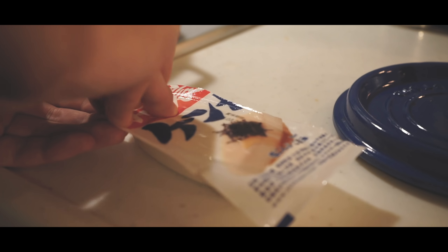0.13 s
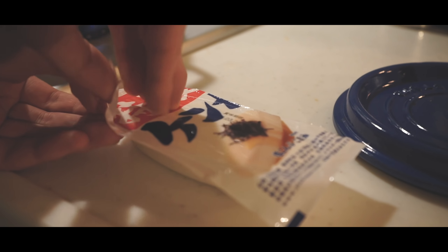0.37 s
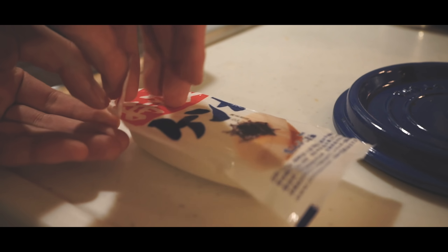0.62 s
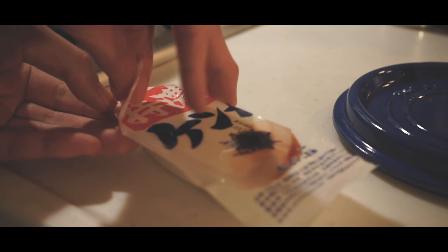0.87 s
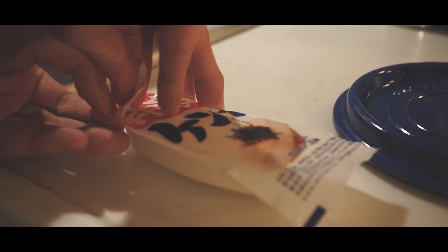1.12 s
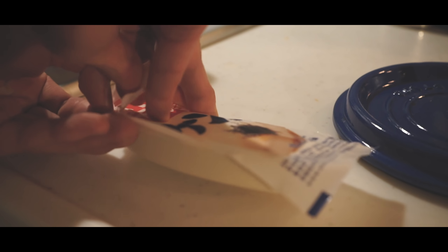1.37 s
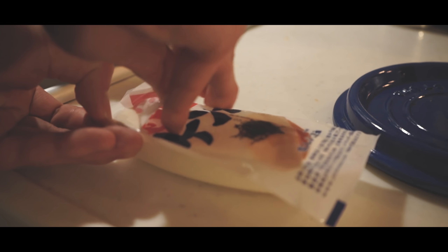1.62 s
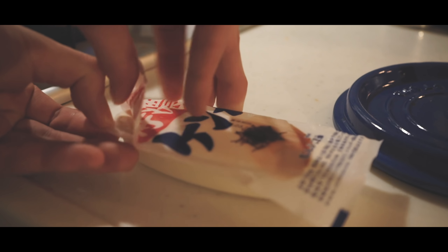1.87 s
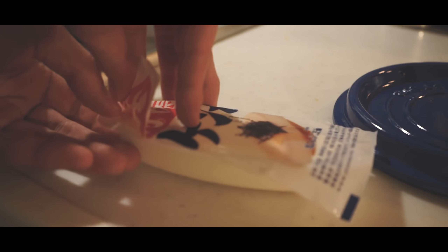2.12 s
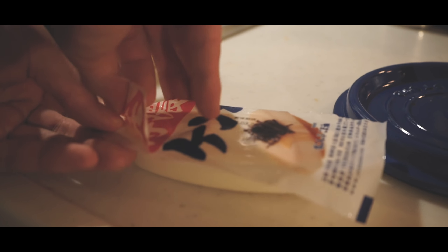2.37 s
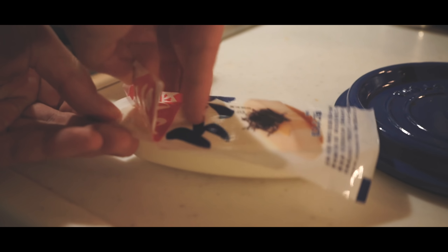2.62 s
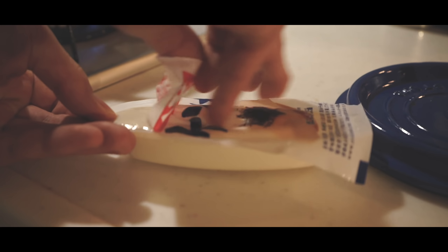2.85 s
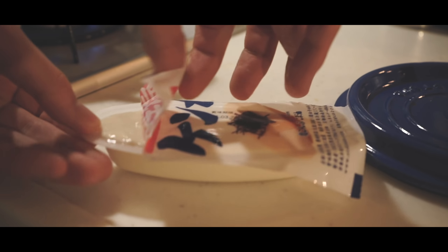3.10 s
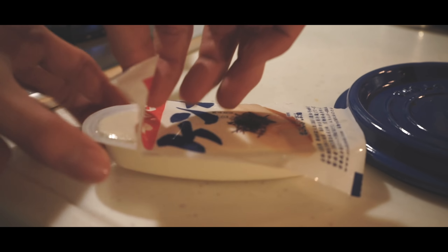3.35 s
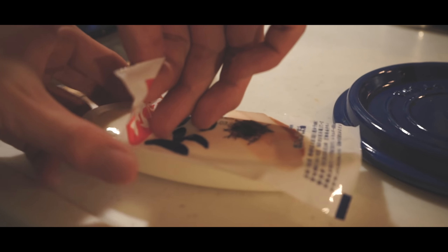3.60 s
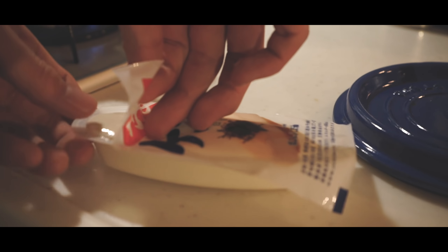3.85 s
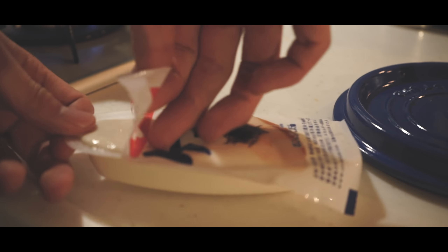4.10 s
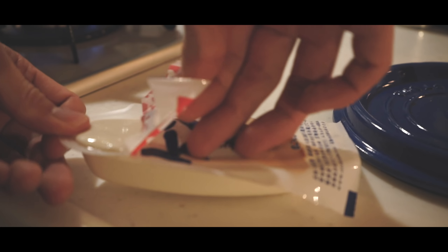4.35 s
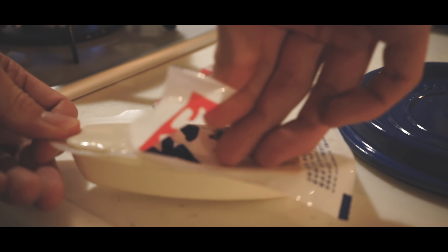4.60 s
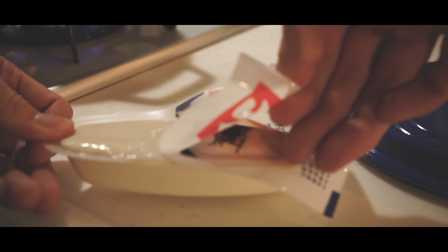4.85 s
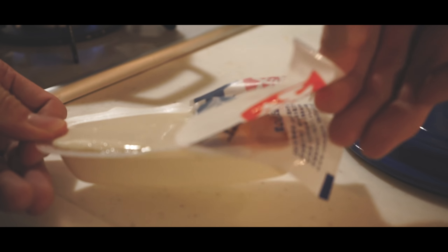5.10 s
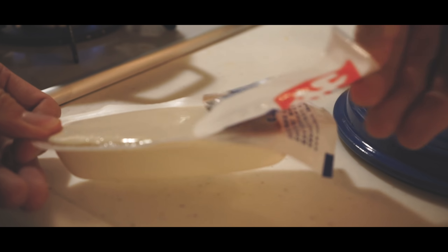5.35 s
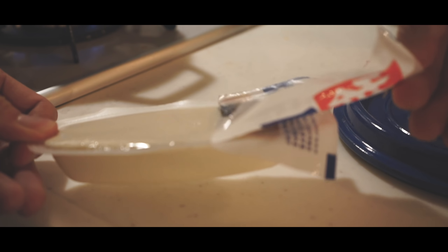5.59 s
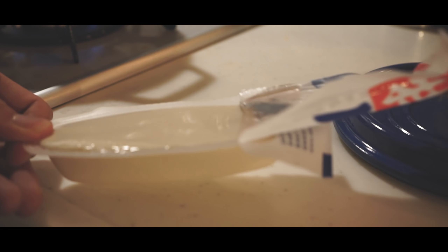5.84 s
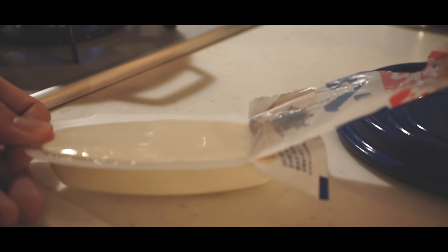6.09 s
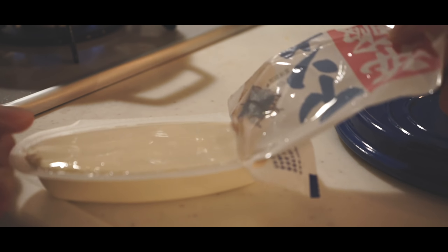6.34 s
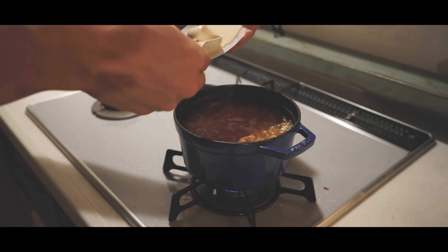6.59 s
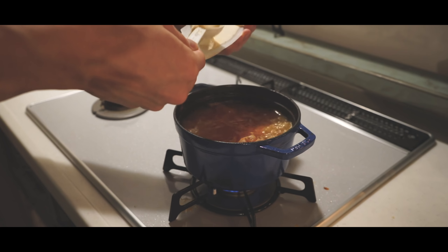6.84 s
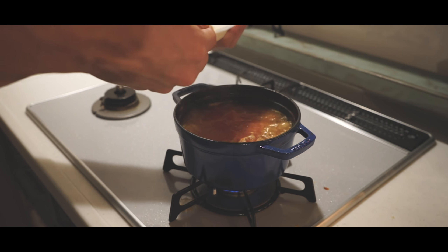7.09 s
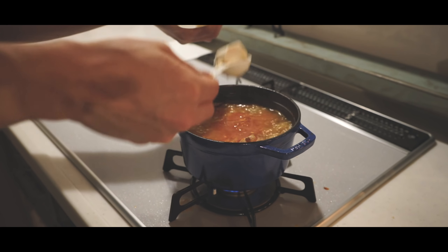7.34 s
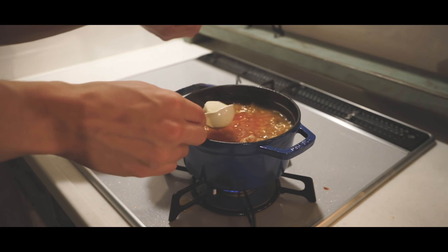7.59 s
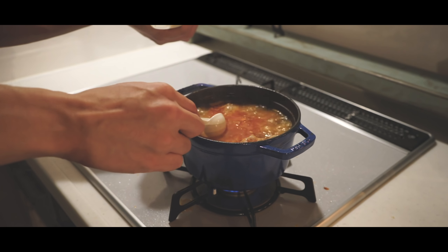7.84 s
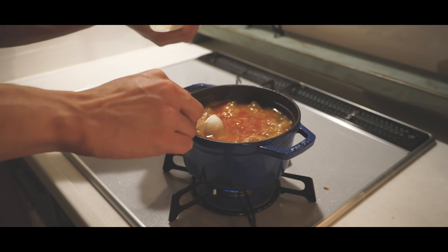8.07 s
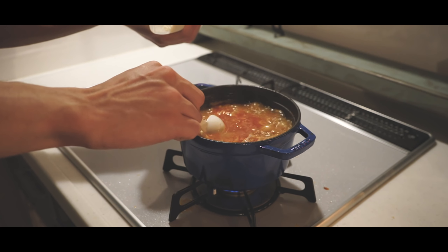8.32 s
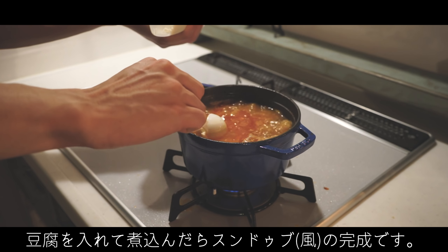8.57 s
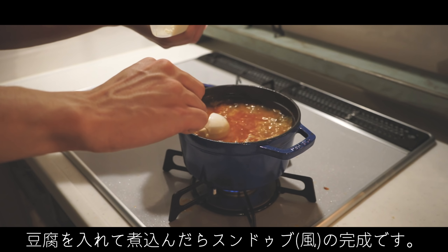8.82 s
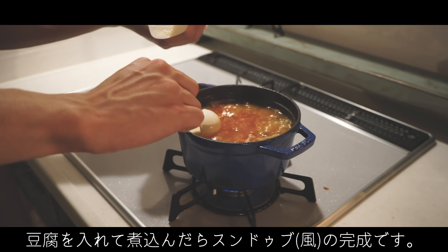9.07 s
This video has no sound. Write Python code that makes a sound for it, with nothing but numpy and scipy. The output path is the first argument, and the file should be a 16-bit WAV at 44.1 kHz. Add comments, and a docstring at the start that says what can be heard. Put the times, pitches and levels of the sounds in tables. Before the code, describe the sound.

Someone crinkles and rips open a plastic packet beside gently plopping soup; after about six seconds only the bubbling, spitting pot and faint flame remain.

```python
"""A plastic packet is handled and torn open close by: stiff film buckles in short damped shivers and cracks
over a rustle of uneven clicks and patchy noise. Soup simmers in a small metal pot on a gas hob: damped sines
plop, spit and ring the pot over shaped noise; the flame is noise that rumbles and hisses.
A worktop echo and decaying noise tails from hard kitchen walls answer every snap and spit."""
import sys
import numpy as np
from scipy import signal
from scipy.fft import rfft, irfft, next_fast_len
from scipy.io import wavfile
from scipy.ndimage import uniform_filter1d, map_coordinates

SR = 44100
rng = np.random.default_rng(int(sys.argv[2]) if len(sys.argv) > 2 else 0)


def file_out(sig):
    """Save sig as 16-bit WAV at sys.argv[1]."""
    # one column per channel
    cols = np.atleast_2d(sig).T
    # limit, then scale
    lim = np.clip(cols, -1, 1)
    pcm = np.round(lim * 32767).astype(np.int16)
    wavfile.write(sys.argv[1], SR, pcm)


def gain_from_db(level_db):
    """Convert decibel levels to linear amplitude factors (20 dB per decade)."""
    decades = np.asarray(level_db, float) / 20
    return 10 ** decades


N = 405719

# film rustle before rubs and clumps: t/s, crackle level/dB, treble level/dB
RUSTLE_LEVELS = [(0.0, -63.5, -55.5), (0.23, -69, -81.5), (0.84, -68, -92), (1.41, -67.5, -80),
                 (1.56, -57.5, -69.5), (2.28, -63, -77), (2.61, -67, -76), (2.77, -52.5, -56),
                 (3.28, -67.5, -79.5), (3.64, -65.5, -70.5), (3.79, -72, -89), (4.07, -65.5, -78.5),
                 (4.53, -68.5, -82), (4.66, -51, -70), (4.79, -44.5, -76), (4.89, -58.5, -67),
                 (5.07, -62.5, -74), (5.74, -65.5, -68.5), (5.89, -49, -48), (6.05, -70.5, -94),
                 (6.58, -67.5, -87), (6.94, -70.5, -76), (7.58, -67, -84), (8.12, -74, -74.5),
                 (8.58, -69.5, -82), (9.2, -63.5, -93)]
# treble hiss spectrum: f/Hz, relative level per Hz/dB
HISS_SPECTRUM = [(4000, -11), (6500, -2), (9000, -5), (15400, -1), (15800, -8), (16100, -44.5)]
# how hard the soup surface breaks: t/s, relative level/dB
VIGOUR_LEVELS = [(0, -5), (6.6, -5), (6.7, 0), (9.2, 0)]


def unit(x):
    """Scaled to rms 1."""
    return x / np.sqrt(np.mean(x ** 2) + 1e-20)


def along(points, hz):
    """Values of (f/Hz, value) points, interpolated on a log frequency axis."""
    f, v = np.transpose(points)
    return np.interp(np.log(hz + 1), np.log(f + 1), v)


def curves(rows):
    """One value per sample for each column after the time."""
    s, *cols = np.transpose(rows)
    return [np.interp(np.arange(N) / SR, s, c) for c in cols]


def wobble(rate):
    """A smooth random curve, rate knots a second."""
    knots = rng.standard_normal(int(N * rate / SR) + 4)
    return map_coordinates(knots, [np.arange(N) * rate / SR])


def filtered(x, response):
    """x times a complex response of frequency."""
    m = next_fast_len(N + SR // 2)
    return irfft(rfft(x, m) * response(np.fft.rfftfreq(m, 1 / SR)), m)[:N]


def coloured(x, spectrum):
    """x given a spectrum, rms 1."""
    return unit(filtered(x, lambda hz: gain_from_db(along(spectrum, hz))))


def resonances(modes):
    """Causal response of (f/Hz, width/Hz, level/dB) modes."""
    return lambda f: sum(gain_from_db(db) * 1j * f * w / (c * c - f * f + 1j * f * w) for c, w, db in modes)


def placed(seconds, rows):
    """Sum of rows, each starting at its own moment."""
    at = np.round(np.asarray(seconds) * SR).astype(int)[:, None] + np.arange(rows.shape[1])
    return np.bincount(at.clip(0).ravel(), rows.ravel(), N + rows.shape[1] + SR)[:N]


def blips(db, hz, cycles, rise, glide=0, size=512):
    """Damped sines of envelope peak db: life in cycles, attack as a share of life, pitch up by glide a life."""
    u = np.arange(size) / SR * hz[:, None] / cycles  # time in lives
    shape = (1 - np.exp(-u / rise)) ** 2 * np.exp(-u)
    wave = np.sin(2 * np.pi * cycles * u * (1 + glide * u / 2))
    return gain_from_db(db)[:, None] * wave * shape / shape.max(1, keepdims=True)


def cracks(db, life_s, low_hz):
    """Treble noise bursts of peak db with an exponential decay, 1/e in life_s."""
    noise = rng.standard_normal((len(db), 256))
    burst = noise * np.exp(-np.arange(256) / SR / life_s)
    band = signal.butter(4, [low_hz, 16800], "band", fs=SR, output="sos")
    burst = signal.sosfilt(band, burst)
    return gain_from_db(db)[:, None] * burst / np.abs(burst).max(1, keepdims=True)


def grains(rate, spread_db):
    """Random clicks of uneven size, rate a second."""
    size = gain_from_db(spread_db * rng.exponential(size=N).clip(0, 4))
    return (rng.random(N) < rate / SR) * rng.standard_normal(N) * size


def patchy(depth_db):
    """Noise whose strength varies in patches of pitch and time, rms 1."""
    z = signal.stft(rng.standard_normal(N), nperseg=512)[2]
    field = uniform_filter1d(uniform_filter1d(rng.standard_normal(z.shape), 14, 0), 6, 1)
    return unit(signal.istft(z * gain_from_db(depth_db * unit(field)), nperseg=512)[1][:N])


def lesser(start_s, end_s, level_db, low_hz, high_hz, count):
    """Random small events: moments, levels within 4 dB of level_db, pitches between two limits."""
    draw = rng.random((count, 3))
    s = start_s + (end_s - start_s) * draw[:, 0]
    db = level_db + 8 * (draw[:, 1] - .5)
    return s, db, low_hz * (high_hz / low_hz) ** draw[:, 2]


def kitchen(x):
    """Wall echoes die band by band; their pattern drifts as the hands move: two tails trade places."""
    # wall decay: f/Hz, t60/s
    decay = [(500, 0.44), (3000, 0.14), (6000, 0.18), (14000, 0.12)]
    # pot and corner colour of the echoes: f/Hz, width/Hz, relative level/dB
    hollow = [(834, 266, 8), (3570, 97, 3), (4800, 570, -26)]
    hz, t, z = signal.stft(rng.standard_normal((2, SR // 2)), SR, nperseg=256)
    fade = gain_from_db(-60 * t / along(decay, hz)[:, None])
    tails = signal.istft(z * fade, SR, nperseg=256)[1]
    turn = 2 * np.pi * 9.5 * np.arange(N) / SR
    parts = np.pad(x * [np.cos(turn), np.sin(turn)], [(0, 0), (60, 0)])
    wet = signal.fftconvolve(parts, tails / np.linalg.norm(tails[0]), axes=1).sum(0)[:N]
    return 0.73 * wet + filtered(wet, resonances(hollow))


def flame():
    """Gas burner: low noise of slowly wandering level rumbles under a thin steady hiss."""
    # rumble: t/s, level/dB
    burner = [(0.0, -72), (0.07, -59), (3.23, -57), (3.33, -50), (3.51, -63.5), (3.56, -55.5),
              (4.05, -63.5), (8.22, -53), (8.56, -58.5), (8.99, -47), (9.02, -55), (9.2, -51.5)]
    # rumble spectrum: f/Hz, relative level per Hz/dB
    rumble_spectrum = [(8.8, -26.5), (15, 2), (84, -4.5), (140, -13), (161, -30), (200, -13), (260, -43.5),
                       (440, -120)]
    flame_db, = curves(burner)
    hiss = gain_from_db(-78) * coloured(rng.standard_normal(N), HISS_SPECTRUM)
    rumble = coloured(rng.standard_normal(N), rumble_spectrum)
    return hiss + gain_from_db(flame_db + 1.1 * wobble(7)) * rumble


def droplets(count):
    """Thrown droplets land in showers of five like-pitched ticks and ring the pot's thin wall."""
    # pot wall: f/Hz, width/Hz, relative level/dB
    rim = [(3450, 150, -1.5), (4780, 130, 1.5), (6330, 90, -5), (7140, 90, -4.5)]
    shower = np.repeat(rng.random((count, 3)), 5, 0)
    draw = rng.standard_normal((count * 5, 3))
    hz = (1300 * 11.5 ** shower[:, 1] * np.exp(.2 * draw[:, 1])).clip(0, 16000)
    # a few big showers among many fine ones
    size_db = 14 * shower[:, 0] ** 3 + 5 * draw[:, 0] + .8 * np.log2(hz)
    s = shower[:, 2] * N / SR + .007 * np.abs(draw[:, 2])
    ticks = unit(placed(s, blips(size_db, hz, cycles=1.3, rise=.3, size=128)))
    return ticks + gain_from_db(4) * filtered(ticks, resonances(rim))


def simmer():
    """Unseen bubbles murmur as lumpy noise, blub as damped sines and throw droplets, louder as the boil grows."""
    # boil, common to murmur and surface: t/s, level/dB
    boil = [(0.0, -56), (1.53, -61.5), (2.61, -57), (2.74, -54), (4.07, -60), (4.82, -54.5), (5.12, -59.5),
            (5.48, -54.5), (6.66, -57.5), (6.92, -52), (7.38, -56.5), (9.2, -51)]
    # murmur spectrum: f/Hz, relative level per Hz/dB
    murmur_spectrum = [(71, -46), (120, 2.5), (178, 0.5), (264, -1.5), (473, -1), (787, -6.5), (905, 7.5),
                       (1050, -11.5), (1580, -12), (2500, -26), (3250, -44), (5500, -120)]
    simmer_db, = curves(boil)
    churn = 1.2 * unit(grains(120, spread_db=-1.0)) + rng.standard_normal(N)
    murmur = gain_from_db(2.2 * wobble(18) - 3.0) * coloured(churn, murmur_spectrum)
    draw = rng.random((1000, 3))
    # a rising pocket breaks into eight bubbles
    burst_s = np.repeat(rng.random(125) * N / SR, 8) + .03 * draw[:, 2] ** 2
    blub_db = 3 + 13 * draw[:, 0] ** 3 - 7 * draw[:, 1]
    blubs = blips(blub_db, 250 * 9 ** draw[:, 1], cycles=.9, rise=.5, size=1024)
    surface = placed(burst_s, blubs) + gain_from_db(-10.5) * droplets(count=650)
    return gain_from_db(simmer_db) * (murmur + gain_from_db(curves(VIGOUR_LEVELS)[0]) * surface)


def pot():
    """Every knock rings the pot's modes at new strengths; the boiling soup roughens the ring."""
    # loud knocks that ring the pot: t/s, level/dB
    loud_knocks = [(0.115, -46), (0.371, -48), (0.399, -39), (0.64, -46), (0.839, -46.5), (1.097, -48.5),
                   (1.206, -47), (1.893, -46), (2.326, -39.5), (2.572, -42.5), (2.914, -46.5),
                   (2.986, -47.5), (3.248, -36), (3.515, -42), (3.635, -43), (4.232, -39), (4.361, -40.5),
                   (4.403, -35.5), (4.454, -37.5), (4.644, -41), (4.718, -34), (4.742, -37), (4.86, -40.5),
                   (5.171, -46.5), (5.438, -39), (5.476, -40), (5.793, -45.5), (6.035, -43.5), (6.3, -40),
                   (6.759, -47), (6.918, -44.5), (7.056, -44), (7.177, -47.5), (7.674, -45), (8.233, -43),
                   (8.557, -48), (8.665, -43), (8.737, -46.5), (8.951, -44), (9.057, -42)]
    # pot modes before scatter: f/Hz, level re knock/dB, t60/s
    pot_modes = [(865.5, 3, 0.066), (967, -5.5, 0.077), (481.3, -13, 0.16)]
    small = lesser(0, N / SR, -53, 1, 1, count=35)[:2]
    s, db = np.hstack([small, np.transpose(loud_knocks)])
    t = np.arange(4096) / SR
    draw = rng.standard_normal((len(s), len(pot_modes), 2))
    ring = 0
    for k, (hz, level_db, t60_s) in enumerate(pot_modes):
        decay = gain_from_db(level_db + 1.54 * draw[:, k, :1] - 60 * t / t60_s)
        ring = ring + decay * np.sin(2 * np.pi * hz * (1 + 0.02 * draw[:, k, 1:]) * t)
    attack = 1 - np.exp(-t / 0.0015)
    return gain_from_db(4 * wobble(110)) * placed(s - .002, gain_from_db(db)[:, None] * ring * attack)


def plops():
    """Big bubbles collapse in blunt damped sines of slightly rising pitch."""
    # loud big bubbles: t/s, peak level/dB, f/Hz
    loud_plops = [(0.066, -44, 452), (0.384, -42, 460), (0.446, -46, 490), (1.093, -48, 465),
                  (1.893, -38.5, 573), (2.324, -46, 360), (2.391, -44, 530), (2.829, -39, 526),
                  (2.913, -40, 638), (3.236, -37.5, 401), (4.724, -37, 546), (5.272, -46.5, 470),
                  (5.375, -45, 448), (6.771, -40.5, 396), (6.849, -41.5, 477), (7.404, -43, 460),
                  (7.672, -40, 440), (7.906, -40, 288), (8.114, -42, 456), (8.228, -43.5, 475),
                  (8.409, -41, 440), (8.608, -46.5, 275), (8.762, -37, 446), (8.899, -43, 278),
                  (9.143, -45, 380)]
    small = lesser(0, N / SR, -53, 240, 560, count=30)
    s, db, hz = np.hstack([small, np.transpose(loud_plops)])
    return placed(s + .002, blips(db, hz, cycles=1.5, rise=.4, glide=.04, size=2048))


def spits():
    """Small bubbles burst with a damped-sine tick, a ragged splash of drops and a noise spray."""
    # loud small bubbles: t/s, tick peak level/dB, f/Hz
    loud_spits = [(6.6607, -45, 2090), (6.7424, -47, 1590), (6.9605, -40, 4790), (6.983, -43, 3500),
                  (7.0567, -48, 1330), (7.0858, -52, 3330), (7.1067, -23, 3700), (7.175, -47, 1490),
                  (7.2986, -44, 1480), (7.3345, -46, 2020), (7.3978, -39.5, 3220), (7.6061, -52, 1340),
                  (7.6194, -37, 2200), (7.655, -39, 1970), (7.6966, -47, 2070), (7.7663, -36, 1560),
                  (7.851, -40, 4870), (7.89, -41, 1360), (7.949, -36.5, 4950), (8.0402, -35.5, 4640),
                  (8.1752, -35.5, 4800), (8.2541, -38.5, 1290), (8.3417, -38.5, 5130), (8.4257, -39, 3150),
                  (8.4664, -40.5, 1770), (8.5455, -43, 2300), (8.566, -40.5, 1440), (8.6176, -42.5, 5380),
                  (8.7001, -48, 1480), (8.7366, -36.5, 1360), (8.7848, -42, 3500), (8.92, -39, 5140),
                  (8.959, -26.5, 3300), (9.0569, -38.5, 1310), (9.0644, -34.5, 3500), (9.1453, -38, 1460)]
    small = lesser(VIGOUR_LEVELS[2][0], N / SR, -51, 1550, 8200, count=35)
    s, db, hz = np.hstack([small, np.transpose(loud_spits)])
    draw = rng.standard_normal((len(s), 13))
    ticks = placed(s, blips(db, hz, cycles=1.57, rise=0.047))
    for k in range(6):  # the torn film falls back in drops
        drop_hz = hz * np.exp(.3 * draw[:, k + 6])
        drops = blips(db - 10, drop_hz, cycles=1.5, rise=.25)
        ticks = ticks + placed(s + .007 * np.abs(draw[:, k]), drops)
    # re tick peak; finer bursts spray more, 3 dB per octave
    spray_db = -22 + 3 * np.log2(hz / 2000) + 5 * draw[:, 12]
    return ticks + placed(s, cracks(db + spray_db, life_s=0.002, low_hz=5500))


def rustle():
    """Countless tiny creases, clumped: gritty noise with its own treble, swelling as fingers slide over the film."""
    # finger rubs: t/s, 1/e half length/s, swell/dB
    rubs = [(0.01, 0.021, 6.5), (0.175, 0.051, 18.5), (0.633, 0.027, 9.5), (0.95, 0.04, 10.5),
            (2.16, 0.057, 3), (3.118, 0.027, 11), (3.705, 0.067, 15), (5.025, 0.061, 13),
            (5.441, 0.057, 17)]
    # crackle spectrum: f/Hz, relative level per Hz/dB
    crackle_spectrum = [(650, -65), (1100, 3.5), (1620, -24), (1770, 2.5), (2260, 8.5), (2740, -1.5),
                        (3430, 9), (3980, -1.5), (5070, 3.5), (8000, -30.5), (10400, -36), (17600, -120)]
    t = np.arange(N) / SR
    rub_db = sum(db * np.exp(-((t - s) / half_s) ** 2) for s, half_s, db in rubs)
    crackle_db, treble_db = np.array(curves(RUSTLE_LEVELS)) + rub_db
    grit = unit(grains(1500, spread_db=9.0))
    clumps_db = 1.8 * wobble(30) + 1.2 * wobble(9)
    body = coloured(0.29 * grit + patchy(depth_db=3), crackle_spectrum)
    flicker_db = .6 * clumps_db + 1.2 * wobble(40)
    treble = coloured(0.48 * grit + patchy(depth_db=2), HISS_SPECTRUM)
    return gain_from_db(crackle_db + clumps_db) * body + gain_from_db(treble_db + flicker_db) * treble


def packet():
    """Each buckle cracks and shivers the bag's face, creases and belly for a few cycles; lesser ones follow the rustle."""
    # loud buckles, crack before its treble filter: t/s, face level/dB, crease level/dB, belly level/dB, crack level/dB
    loud_snaps = [(0.0705, -44, -27, -43, -35), (0.1288, -31, -26.5, -48, -35.5),
                  (0.1546, -26.5, -31, -31, -28), (0.1618, -39, -24.5, -58, -46),
                  (0.181, -38, -30, -48, -33), (0.1924, -37, -34, -56, -39), (0.2002, -38, -32, -56, -35),
                  (0.39, -30.5, -32.5, -34.5, -58), (0.501, -29, -18.5, -43, -27),
                  (0.7255, -20.5, -25.5, -25, -38), (0.7601, -28.5, -33, -34.5, -52.5),
                  (0.7687, -34, -36, -44, -49), (0.7902, -41, -39, -59, -45),
                  (1.031, -18.5, -20.5, -62, -26.5), (1.4137, -42.5, -28.5, -63.5, -38.5),
                  (1.4795, -28.5, -28, -48, -40), (1.496, -32, -30, -52, -45),
                  (1.506, -25.5, -21, -38, -35), (1.5218, -14, -14.5, -34, -33),
                  (1.5266, -21, -14.5, -42, -25), (1.5344, -19, -21, -31, -28),
                  (1.5435, -19, -26, -29, -27), (1.548, -42, -7.5, -20.5, -21),
                  (1.5536, -14.5, -24, -56, -27), (1.5589, -14.5, -17, -35, -29),
                  (1.5679, -26, -35, -29, -35), (1.5864, -22.5, -11.5, -27, -17),
                  (1.6361, -30.5, -31.5, -63, -35.5), (1.729, -39, -30, -42, -33),
                  (1.8711, -17.5, -12, -41.5, -28), (1.8921, -25.5, -21, -29, -24.5),
                  (1.8969, -20.5, -27, -40, -48), (2.0977, -45, -57, -49, -64.5),
                  (2.3518, -31, -39.5, -37.5, -46), (2.3823, -45, -39, -46.5, -60),
                  (2.4388, -42.5, -36, -63, -40), (2.5716, -26, -29, -34, -36),
                  (2.6034, -20.5, -16, -33.5, -23.5), (2.6535, -21, -22, -26, -28.5),
                  (2.6602, -28, -36, -38, -43), (2.701, -40, -45, -55.5, -39), (2.751, -28, -38, -59, -49),
                  (2.77, -42, -42, -67, -45), (2.779, -31, -28, -55, -52), (2.792, -35, -35, -58, -55),
                  (2.801, -30, -33.5, -45, -40), (2.8165, -23, -20, -33, -28),
                  (2.821, -27.5, -28, -33, -31), (2.8271, -24, -11.5, -46, -29), (2.832, -7, -16, -26, -21),
                  (2.8364, -26, -41, -26, -37), (2.8406, -8, -47, -30, -31), (2.8495, -18, -56, -31.5, -35),
                  (2.856, -28, -19, -28, -20), (2.8806, -9.5, -11, -38.5, -20.5),
                  (2.887, -27, -31.5, -48, -51), (2.915, -33, -29, -37, -47),
                  (2.9478, -30, -47.5, -36, -42), (2.9866, -31.5, -49, -41, -63),
                  (3.1143, -33.5, -38.5, -53, -55), (3.1634, -39, -37.5, -56, -45),
                  (3.1896, -42, -39, -56, -49), (3.2306, -25, -19, -32.5, -29.5),
                  (3.2377, -18, -25.5, -26, -38), (3.3995, -46, -58, -38, -62),
                  (3.4443, -24.5, -33, -34.5, -43), (3.4752, -26, -35, -33.5, -54),
                  (3.567, -15, -18.5, -37, -40), (3.5703, -23.5, -36, -24, -59),
                  (3.6091, -31.5, -37.5, -20.5, -56), (3.6348, -15.5, -40, -16.5, -55),
                  (4.1823, -26.5, -35, -21, -61.5), (4.2054, -22, -40, -39, -42),
                  (4.209, -13.5, -31, -43, -38), (4.2988, -32, -41, -45, -45), (4.332, -25, -36, -39, -39),
                  (4.3568, -26, -24, -32, -44), (4.3629, -15.5, -18.5, -35, -29),
                  (4.3701, -19, -23, -41, -47), (4.396, -16, -19.5, -41.5, -47.5),
                  (4.4015, -17.5, -17.5, -23.5, -30), (4.4201, -23.5, -55, -41, -37),
                  (4.452, -25, -28, -31, -33), (4.4568, -8.5, -25, -19.5, -30.5),
                  (4.5935, -29.5, -28, -50, -37.5), (4.6121, -32.5, -28.5, -44, -37),
                  (4.644, -45.5, -42.5, -38, -40), (4.6711, -22, -42, -37, -30),
                  (4.6799, -35, -37.5, -48, -42), (4.69, -36, -40, -46, -30), (4.707, -25.5, -31, -53, -34),
                  (4.7129, -17, -32.5, -41, -27), (4.7174, -32, -25.5, -46, -39),
                  (4.7258, -25.5, -35, -42.5, -44), (4.733, -32.5, -41, -45.5, -31),
                  (4.741, -22, -46.5, -45.5, -44), (4.757, -41, -40, -49.5, -42.5),
                  (4.7797, -42.5, -41, -55, -30.5), (4.8066, -40, -39, -46, -33.5),
                  (4.8203, -45.5, -32, -50, -34.5), (4.834, -38.5, -37, -36.5, -42.5),
                  (4.859, -26, -39.5, -42, -33), (4.9166, -20.5, -20, -37, -43),
                  (4.9324, -6.5, -13.5, -22, -18), (4.9447, -23.5, -49.5, -34, -52.5),
                  (4.9561, -28.5, -36, -39.5, -64), (4.969, -25, -55, -34.5, -60),
                  (4.9982, -30.5, -45.5, -36.5, -45), (5.0199, -29, -29, -33, -34),
                  (5.0402, -28, -36.5, -34, -37), (5.0812, -26.5, -27, -39.5, -32.5),
                  (5.1712, -36, -38.5, -45, -56), (5.2628, -33.5, -29.5, -36.5, -45),
                  (5.3015, -52, -38.5, -47.5, -33), (5.3144, -16, -17.5, -32.5, -35.5),
                  (5.364, -36, -26.5, -33, -30.5), (5.3922, -34, -27, -43.5, -31),
                  (5.4113, -26, -25, -33.5, -25), (5.4356, -35, -29, -43, -42),
                  (5.4392, -31, -14, -25.5, -10), (5.4491, -29.5, -42, -34, -41),
                  (5.46, -28, -26, -29.5, -27.5), (5.4845, -28.5, -51.5, -32, -60.5),
                  (5.5285, -35, -35, -41, -33), (5.7473, -28, -29.5, -32, -32.5),
                  (5.7618, -27, -44.5, -38, -40), (5.7684, -30, -36, -39.5, -30.5),
                  (5.7927, -24, -25, -30.5, -33), (5.8351, -24.5, -27, -31, -29),
                  (5.8622, -29, -23, -35, -22.5), (5.8741, -34, -30, -39, -28),
                  (5.8838, -33.5, -15, -38, -25), (5.9011, -19.5, -25, -27, -25.5),
                  (5.989, -24, -26.5, -33, -26), (5.9991, -31.5, -28, -40.5, -31.5),
                  (6.0104, -29, -27, -34, -35), (6.0235, -33, -52, -41, -35),
                  (6.2669, -30, -36, -33.5, -59), (6.3012, -24.5, -25.5, -24, -45)]
    # face, crease, belly before detuning: f/Hz, life/cycles
    bag_modes = [(3150, 1.2), (4900, 1.3), (1700, 1.0)]
    packet_down_s = 6.35  # the packet is put down: no lesser buckles after
    draw = rng.standard_normal((120, 4))
    # the louder the rustle, the more buckles
    busy = np.cumsum(gain_from_db(curves(RUSTLE_LEVELS)[0][:int(packet_down_s * SR)]))
    when_s = np.searchsorted(busy, busy[-1] * rng.random(len(draw))) / SR
    bed_s, crackle_db, treble_db = np.transpose(RUSTLE_LEVELS)
    body_db = np.interp(when_s, bed_s, crackle_db) + 12
    small_crack_db = np.interp(when_s, bed_s, treble_db) + 17
    small_db = np.transpose([body_db, body_db, body_db - 6, small_crack_db]) + 4 * draw
    s, *voices_db, crack_db = np.vstack([np.c_[when_s, small_db], loud_snaps]).T
    detune = np.exp(.06 * rng.standard_normal((len(s), len(bag_modes))))
    shiver = 0
    for k, (db, (hz, cycles)) in enumerate(zip(voices_db, bag_modes)):
        shiver = shiver + blips(db, hz * detune[:, k], cycles, rise=0.92)
    crack = placed(s + .0006, cracks(crack_db, life_s=0.00053, low_hz=5900))
    crack = filtered(crack, lambda hz: 2.76 / (1 + 1j * hz / 9000))
    return placed(s + .0004, shiver) + crack


def scene():
    """Packet, soup and flame in one small kitchen; the worktop throws back one dull early echo."""
    clicks = packet() + spits()
    worktop = filtered(clicks, lambda hz: gain_from_db(-11) * np.exp(-2j * np.pi * hz * 0.002666) / (1 + 1j * hz / 4000))
    walls = gain_from_db(-9.5) * kitchen(clicks)
    soup = plops() + pot() + simmer()
    return (clicks + worktop + walls + soup + rustle() + flame())[None]


def band_limit(x):
    """A steep low-pass at the top of the band."""
    return signal.sosfilt(signal.butter(12, 17140, fs=SR, output="sos"), x)


def record(dry):
    """A small camera's microphone, fading at the top."""
    # microphone response: f/Hz, gain/dB
    microphone = [(20, -1.5), (60, -2.5), (10000, 1.5), (15700, -1), (16000, -12), (17500, -22)]
    mix = filtered(dry[0], lambda hz: gain_from_db(along(microphone, hz)))[None]
    return band_limit(mix)


dry = scene()
out = record(dry)
file_out(out)
```